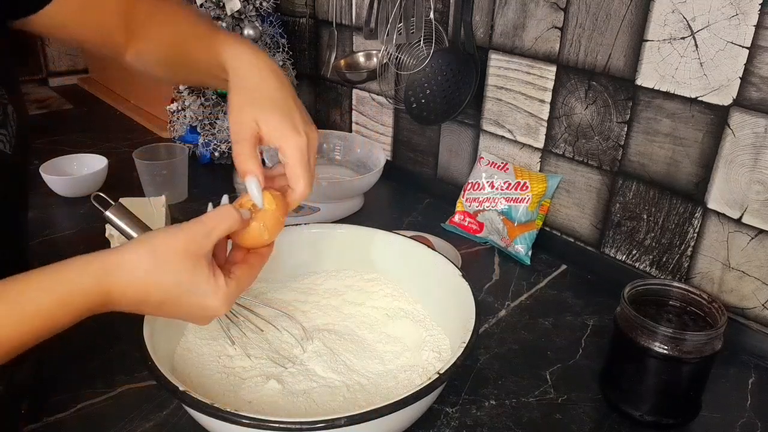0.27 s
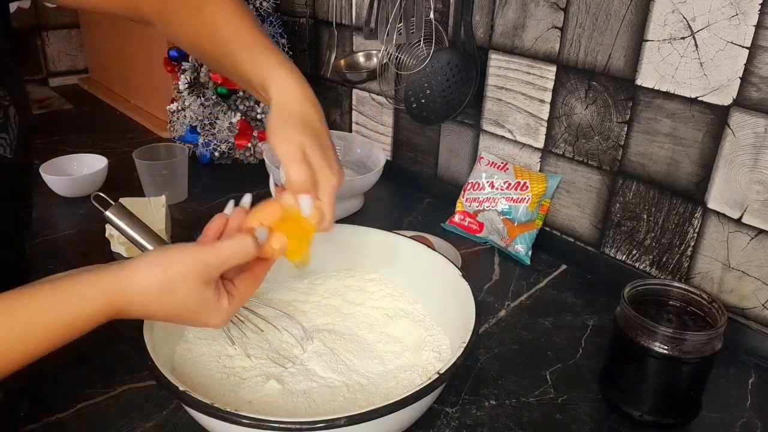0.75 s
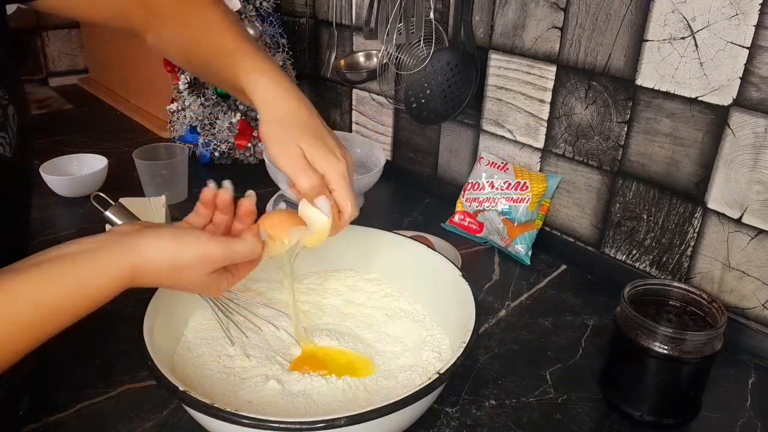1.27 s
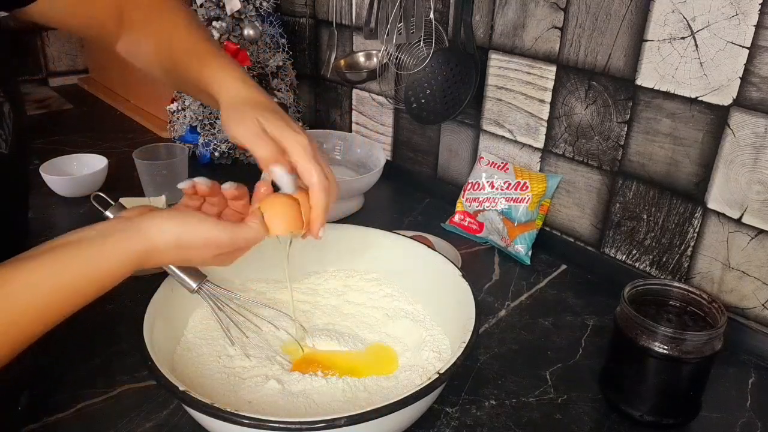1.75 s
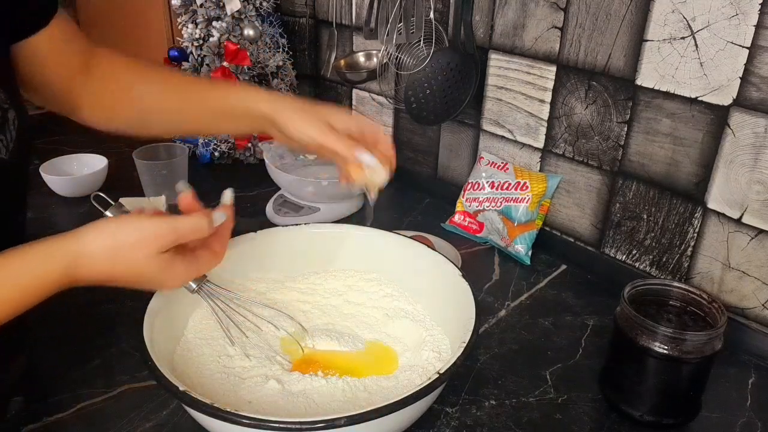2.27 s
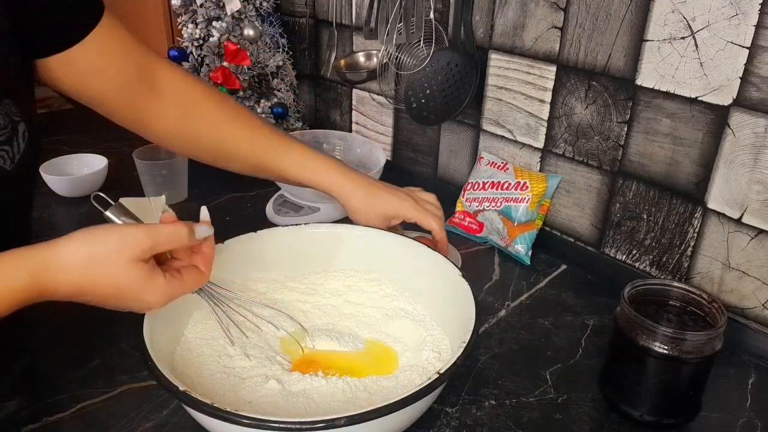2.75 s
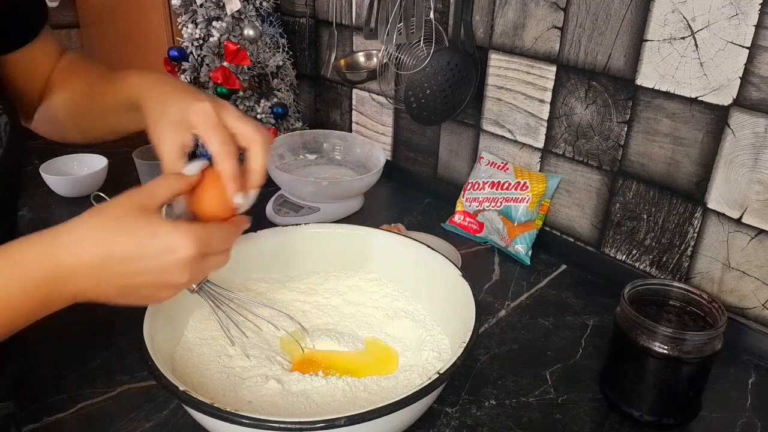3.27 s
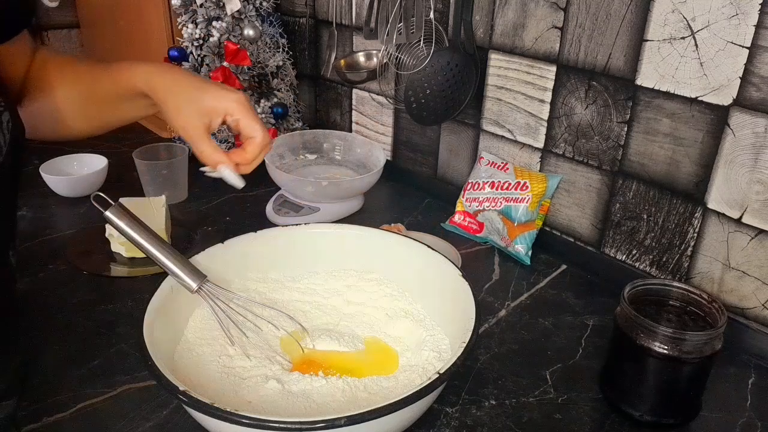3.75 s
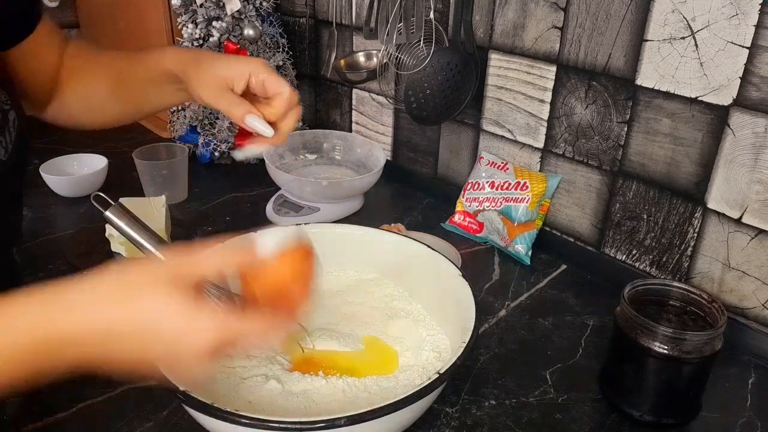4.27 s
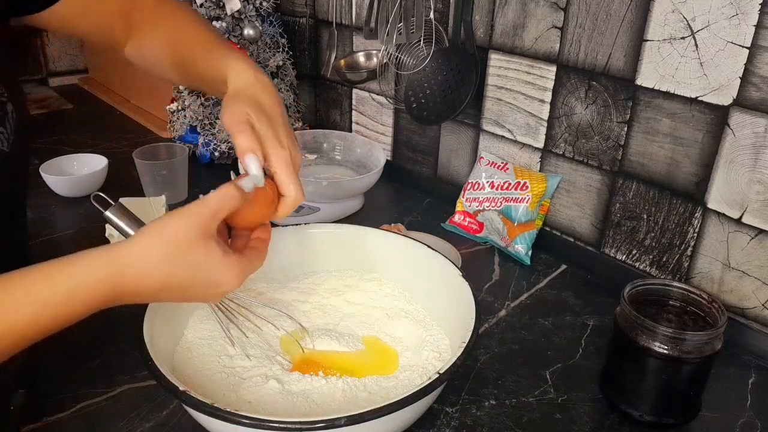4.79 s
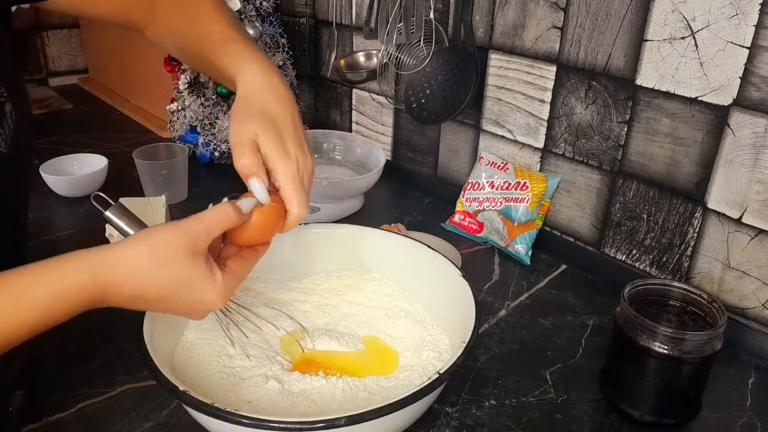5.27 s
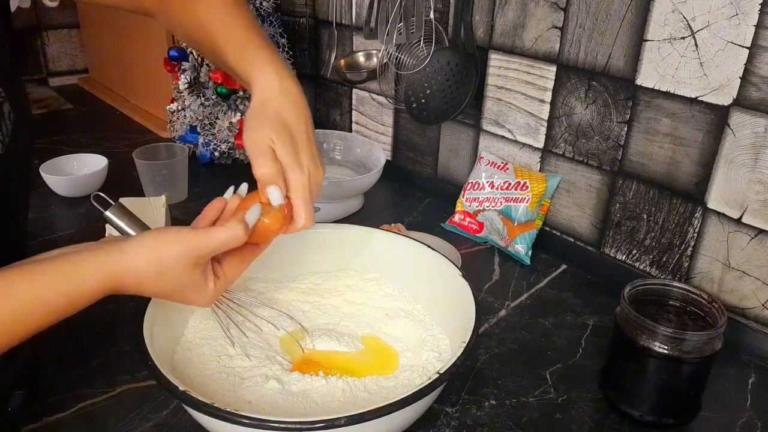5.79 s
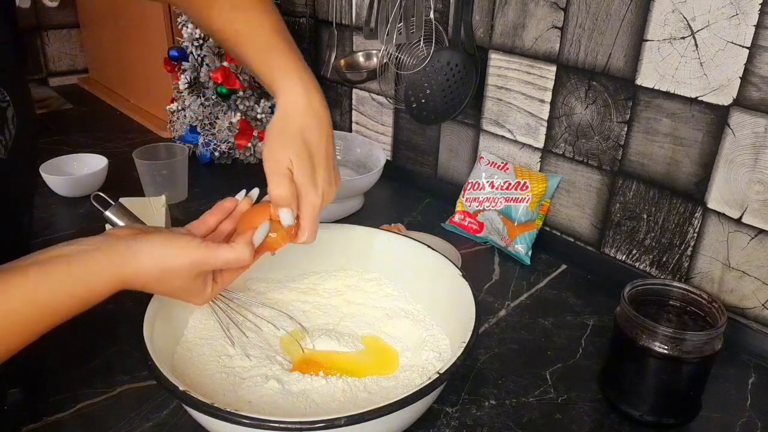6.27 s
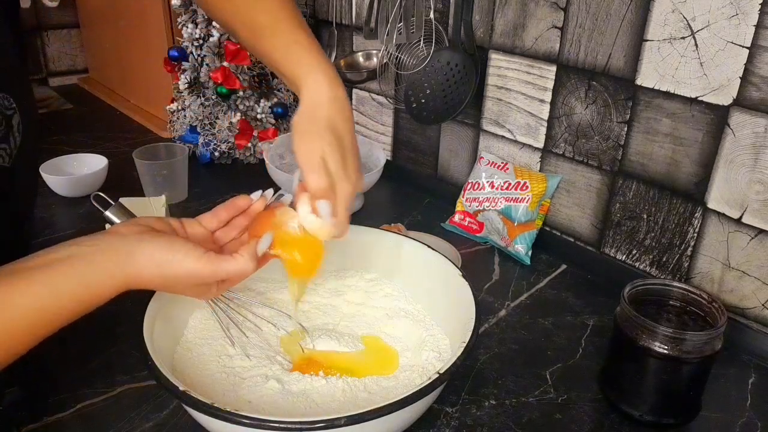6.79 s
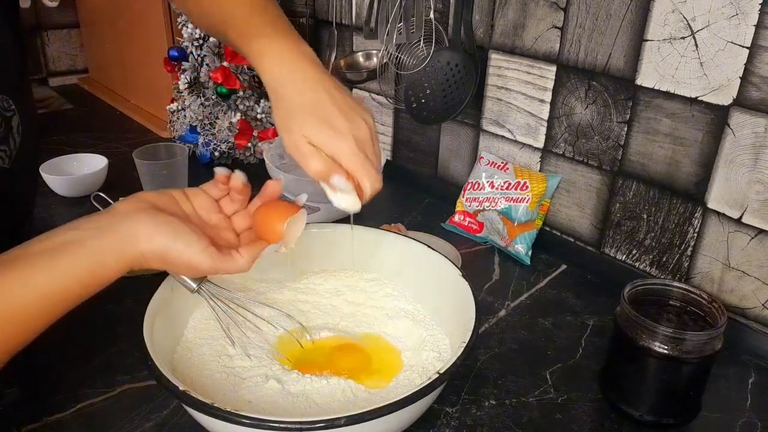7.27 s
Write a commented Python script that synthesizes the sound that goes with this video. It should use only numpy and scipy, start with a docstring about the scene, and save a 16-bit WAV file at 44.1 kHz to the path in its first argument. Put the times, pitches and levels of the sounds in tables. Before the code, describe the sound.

A close stereo microphone in a small tiled kitchen hears a steady low fridge hum near 100 Hz, with soft rumbling air and faint hiss, gently rising and falling. From 0 to 0.7 seconds, eggshell ticks under fingers, with its strongest crisp crack at about 0.5. Faint crumbling follows, growing into a hollow flurry of small crackles at 1.5 to 1.9. Around 2.4 a thin dish gives a very short, high ringing squeak, slightly to the right, followed by dull plastic bowl bumps until 2.75. Mostly hum remains, with tiny ticks, until a hard, dry egg knock on the worktop at 3.86 with a quickly fading noisy tail. From 4.8 brittle picking returns, with a sharp snap at 5.44, scattered crackles, then the biggest crunch at 6.5 to 6.63. Sparse, faint shell ticks trail off to 7.5 over the hum, with short room echoes.

```python
"""Shell crackles under picking nails over the hum of a fridge: two eggs are opened by hand in a tiled kitchen.
Later a thin dish squeaks, a plastic bowl is bumped, and an egg is knocked hard on the worktop.
Shell breaks are short noise puffs through resonances; the dish is a set of sines, the bowl filtered blows.
The knock is a tick with a noisy tail; the fridge is two low tones with air noise and hiss, and the
levels of hum and background are set over time by a table. Noise tails add the small room."""
import sys
import numpy as np
from scipy import signal
from scipy.fft import rfft, irfft
from scipy.io import wavfile
from scipy.ndimage import uniform_filter1d

SR = 44100
rng = np.random.default_rng(int(sys.argv[2]) if len(sys.argv) > 2 else 0)


def dump_mix(stems):
    """Bounce the given channels to the path in sys.argv[1] as a 16-bit WAV at rate SR."""
    frames = np.atleast_2d(stems).T  # one column per channel
    limited = np.clip(frames, -1, 1)  # hard clip at full scale
    pcm = np.round(limited * 32767).astype(np.int16)
    wavfile.write(sys.argv[1], SR, pcm)


def gain_from_db(level_db):
    """Turn a decibel level (scalar or array-like) into a linear amplitude factor."""
    decades = np.asarray(level_db, float) / 20
    return 10 ** decades


N = 332514  # length in samples
TIME = np.arange(N) / SR


def curve(rows):
    """Turn each level column of a table into one value per sample, silent outside the table."""
    s, *columns = np.transpose(rows)
    return [np.interp(TIME, s, column, -120, -120) for column in columns]


def on_log(points, hz):
    """Read (pitch, value) points on a log-frequency axis."""
    point_hz, value = np.transpose(points)
    return np.interp(np.log(hz + 1), np.log(point_hz), value)


def unit(x):
    """Scale to rms 1."""
    return x / np.sqrt(np.mean(x ** 2))


def peak(x, db):
    """Scale to a peak level in dB."""
    return x * gain_from_db(db) / np.abs(x).max()


def band(x, hz, width):
    """Pass x through a resonance with gain 1 at its centre."""
    return signal.lfilter(*signal.iirpeak(hz, hz / width, fs=SR), x)


def band_twice(x, hz, width, second_width):
    """Pass x through two resonances at one pitch, for steeper sides."""
    return band(band(x, hz, width), hz, second_width)


def colour(x, points):
    """Weight the spectrum of x by (pitch_hz, level_db) points."""
    size = x.shape[-1]
    gain_db = on_log(points, np.fft.rfftfreq(size, 1 / SR))
    return irfft(rfft(x) * gain_from_db(gain_db), size)


def add(out, x, s):
    """Mix x into out from time s in seconds."""
    i = int(s * SR)
    out[..., i:i + x.shape[-1]] += x[..., :N - i]


def burst(decay_s, size=1024):
    """Make a puff of noise that dies within milliseconds."""
    return rng.standard_normal(size) * np.exp(-np.arange(size) / (decay_s * SR))


# how long the room rings at each pitch, to fall by 60 dB: pitch_hz, ring_time_s
ROOM_RING = [(200, 0.23), (1000, 0.24), (4000, 0.18), (9000, 0.09), (15000, 0.14)]


def room(x):
    """Add the kitchen's echoes: octave bands of noise, each dying at its own rate, most alike in the bass."""
    t = TIME[:SR // 2]
    tail = 0
    for hz in 125 * 2. ** np.arange(8):
        centre_hz = min(hz, 14000)
        noise = band(rng.standard_normal((2, len(t))), centre_hz, centre_hz * 1.29)
        noise = noise + min(300.0 / hz, 2) * noise.mean(axis=0)  # shared by left and right
        fade = np.exp(-np.log(1000) * t / on_log(ROOM_RING, hz))
        tail = tail + unit(noise) * np.sqrt(hz) * fade
    tail = tail * np.clip(t / 0.0027, 0, 1)  # the first walls answer after a few milliseconds
    tail = tail / np.sqrt((tail ** 2).sum() / 2)
    return signal.fftconvolve(x[None], tail, axes=1)[:, :N]


def near(x):
    """Delay the left side by one sample; bowl and worktop scatter the sound for a few milliseconds."""
    scatter = gain_from_db(-19) * band(np.array([burst(.002), burst(.002)]), 7000., 12000.)
    scatter[0, 1] = scatter[1, 0] = 1  # the direct sound
    return signal.fftconvolve(x + np.zeros((2, 1)), scatter, axes=1)[:, :N]


# levels of hum and background noise over time: time_s, relative_hum_db, relative_background_db
BACKGROUND_LEVELS = [(0.0, -43, 2), (0.04, -34.5, 4), (0.9, -40, -1), (1.34, -35.5, 0.5), (1.41, -42.5, 1),
                     (1.62, -35.5, 1.5), (2.01, -38.5, 0), (2.08, -44, -0.5), (2.48, -29.5, 3.5),
                     (2.54, -36, 0.5), (3.53, -35, 1.5), (4.11, -40.5, -3.5), (4.66, -37, -1.5),
                     (4.7, -41.5, -3.5), (5.23, -33.5, 4), (5.27, -40, -0.5), (5.46, -31, 5),
                     (5.67, -36, 0), (6.49, -35, 0.5), (7.54, -37.5, 0)]
# tone colour of the air noise: pitch_hz, relative_level_db (per Hz)
AIR_COLOUR = [(20, -41), (32, -13.5), (50, 5.5), (120, 1), (210, -2), (300, -9), (500, -13.5), (800, -20),
              (1100, -25), (2000, -33), (5000, -65)]
# narrow peaks in the background noise: pitch_hz, width_hz, level_db (before the level table)
AIR_PEAKS = [(177.9, 29.6, -52), (327.8, 42, -64), (722, 59, -72.5), (7520, 380, -68.5), (8320, 680, -67)]
# how alike left and right are: pitch_hz, likeness (0 to 1)
AIR_ALIKE = [(60, 0.4), (250, 0.9), (600, 0.2), (3000, 0), (16000, 0.27)]
# tone colour of the hiss: pitch_hz, relative_level_db (per Hz)
HISS_COLOUR = [(500, -36.5), (1500, 5.5), (3000, 5), (5000, -1.5), (6500, -3), (10000, -4.5), (13000, 3),
               (16000, 0.5)]


def fridge():
    """Put a mains hum and a shaft tone over air noise and hiss, most alike left and right in the lows."""
    hum_hz, shaft_hz = 99.4, 41.9
    air_db, hiss_db, flicker_db = -44, -58, 2  # noise before the level table; rms random change of the hum
    hum_db, background_db = curve(BACKGROUND_LEVELS)
    flicker = uniform_filter1d(uniform_filter1d(rng.standard_normal(N), size=3000), size=3000)
    hum_db = hum_db + flicker_db * unit(flicker)

    mid, side = rng.standard_normal((2, N))
    alike = np.clip(on_log(AIR_ALIKE, np.fft.rfftfreq(N, 1 / SR)), 0, 1)
    mid = irfft(rfft(mid) * np.sqrt(1 + alike), N)
    side = irfft(rfft(side) * np.sqrt(1 - alike), N)
    noise = mid + side * np.array([[1], [-1]])
    air = unit(colour(noise, AIR_COLOUR)) * gain_from_db(air_db)
    hiss = unit(colour(noise[:, ::-1], HISS_COLOUR)) * gain_from_db(hiss_db)  # same noise played backwards
    peaks = sum(gain_from_db(db) * unit(band_twice(noise, hz, w, w)) for hz, w, db in AIR_PEAKS)

    hum = gain_from_db(hum_db + np.array([[3.3], [2.7]])) * np.sin(2 * np.pi * hum_hz * TIME)
    slow_db = uniform_filter1d(hum_db, size=SR // 4)  # the shaft tone takes a smoothed copy of the hum level
    shaft = gain_from_db(slow_db - np.array([[6.5], [7.5]])) * np.sin(2 * np.pi * shaft_hz * TIME)
    return (air + hiss + peaks) * gain_from_db(background_db) + hum + shaft


# a plastic bowl bumped on the worktop: start_s, relative_level_db, clack_db (against the body of the bump)
BUMPS = [(2.431, -15.5, 0), (2.436, -16, 7.5), (2.444, -15, 3.5), (2.452, -33, -14), (2.467, -27.5, 4.5),
         (2.626, -30, -32), (2.646, -23, -28.5), (2.656, -17, -28), (2.668, -36, -13.5), (2.678, -36, -12),
         (2.699, -35.5, -10), (2.72, -22.5, -31), (2.734, -46, -8)]
# resonances of the bowl: pitch_hz, width_hz, relative_level_db
BOWL = [(189, 48, -7), (332, 60, -6), (389, 52, -0.5), (506, 37, -19.5), (660, 34, -6.5), (880, 63, -47.5)]


def bumps():
    """Send soft blows through the resonances of the bowl, with a louder clack on the sharper ones."""
    out = np.zeros(N)
    for s, db, clack_db in BUMPS:
        push = signal.lfilter(*signal.butter(4, 1000., fs=SR), burst(0.0061, size=4096))
        body = peak(sum(gain_from_db(mode_db) * band(push, hz, w) for hz, w, mode_db in BOWL), 0)
        clack = peak(band(burst(0.0073, size=4096), 1820.0, 3500.0), clack_db)
        add(out, gain_from_db(db) * (body + clack), s)
    return out


# ringing pitches of a thin dish: pitch_hz, ring_time_s (to fall 60 dB), squeak_db, tap_db (both relative)
DISH = [(1746, 0.12, -26.5, -36), (3556, 0.14, -23, -30), (4310, 0.11, -28.5, -48),
        (5410, .081, -24.5, -41), (6790, 0.056, -44, -38), (7390, 0.083, -19.5, -53),
        (8500, .06, -42.5, -56), (10000, 0.05, -35, -40.5), (11800, 0.054, -31.5, -50.5)]
# the dish is dragged, the grip swelling and letting go: time_s, grip_db (relative)
SCRAPE = [(2.379, -48.5), (2.386, -13), (2.418, -0.5), (2.44, -14), (2.45, -46)]
# light taps on the dish: start_s, relative_level_db
TAPS = [(2.452, -2), (2.656, -9.5), (2.722, -21)]


def dish():
    """Sing the dish's pitches as stick and slip drive them, a little roughly; light taps ring them again."""
    grip = gain_from_db(curve(SCRAPE)[0])
    out, t = np.zeros(N), TIME[:SR // 2]
    for hz, ring_s, squeak_db, tap_db in DISH:
        rough = unit(band(rng.standard_normal(N), hz, 140.0))
        tone = np.sin(2 * np.pi * hz * TIME)
        out = out + gain_from_db(squeak_db) * grip * (tone + 0.3 * rough)
        for s, db in TAPS:
            fade = gain_from_db(db + tap_db - 60 * t / ring_s)
            add(out, fade * np.sin(2 * np.pi * hz * t), s)
    return out


# the egg on the worktop: start_s, tick_level_db (peak before scattering)
KNOCK = (3.8598, 2.5)
# tone colour of the noisy tail: pitch_hz, relative_level_db (per Hz)
TAIL_COLOUR = [(29, -31), (50, 5), (151, -4), (183, -17.5), (317, 6.5), (360, -11.5), (427, -9),
               (879, -1.5), (1400, -7.5), (2190, -1.5), (3890, -8.5), (5120, -5.5), (8000, -17.5),
               (10400, -52), (17600, -120)]


def knock():
    """Make a hard tick as the shell caves in, then a wide noisy tail whose level follows a set curve."""
    s, db = KNOCK
    tick = np.zeros(N)
    snap = band(burst(0.00068), 3300., 4000.0)
    sizzle = band(burst(0.002), 12000.0, 8000.)
    add(tick, peak(snap + gain_from_db(-12.5) * sizzle, db), s)

    # the level in dB drops with the square of time: little at first, then ever faster
    t = np.clip(TIME - s, 0, 1)
    tail_level = (TIME > s) * gain_from_db(-19.5 - 9.5 * (t / 0.096) ** 2)
    # the treble flashes for about 10 ms, then dulls steadily by 71 dB a second against the rest
    treble_db = -5 - 71 * t + 8 * np.exp(-t / 0.01)
    noise = rng.standard_normal((3, N))
    noise = noise[:2] + 0.49 * noise[2]  # partly shared by left and right
    treble = band(band(noise, 12300.0, 9000.), 12800.0, 9000.)
    tail = tail_level * (unit(colour(noise, TAIL_COLOUR)) + gain_from_db(treble_db) * unit(treble))
    return tick, tail


# shell and skin crumbling under the fingers, one list per spell of handling: time_s, relative_level_db
CRUMBLE = [
    [(0.0, -41), (0.044, -38.5), (0.094, -58), (0.132, -34.5), (0.208, -56.5), (0.408, -53), (0.5, -40.5),
     (0.736, -64)],
    [(1.0, -60), (1.128, -50), (1.272, -59), (1.294, -45.5), (1.504, -57.5), (1.532, -41.5), (1.68, -45.5),
     (1.76, -48.5), (1.79, -29), (1.88, -45.5), (2.0, -90)],
    [(4.72, -69), (4.822, -41.5), (4.89, -57), (4.904, -32.5), (5.066, -64), (5.114, -29.5), (5.27, -73),
     (5.352, -33), (5.42, -49), (5.668, -59), (5.682, -41), (5.86, -53), (5.95, -65)],
    [(6.05, -57), (6.39, -58.5), (6.46, -73), (6.522, -37.5), (6.6, -58), (6.68, -55), (6.78, -53),
     (6.85, -66), (6.866, -56), (6.97, -52), (7.06, -60), (7.336, -65.5), (7.378, -56.5), (7.54, -62)],
]
# sound of each spell; opened halves are duller and hollower: pitch_hz, hollow_db (against the bright part)
CRUMBLE_COLOUR = [(6500, -5.5), (4000, 0), (6500, -10.5), (6500, -2.5)]


def crumble():
    """Scatter about two thousand tiny breaks a second, a few bigger than the rest."""
    chance = rng.random(N)
    size = np.minimum(rng.exponential(size=N), 4)
    ticks = (chance < 2000 / SR) * gain_from_db(3.3 * size) * rng.standard_normal(N)
    hollow = unit(band_twice(ticks, 1680, 230.0, 600.))
    out = 0
    for rows, (hz, hollow_db) in zip(CRUMBLE, CRUMBLE_COLOUR):
        bright = unit(band_twice(ticks, hz, 1.1 * hz, 1.7 * hz))
        out = out + gain_from_db(curve(rows)[0]) * (bright + gain_from_db(hollow_db) * hollow)
    return out


# shell cracks: start_s, ring_level_db (peak before scattering), pitch_hz, brittle_db (relative brightness)
CRACKS = [(0.0153, -35, 6500, 0), (0.0313, -21.5, 7400, -19), (0.046, -20, 7250, -12),
          (0.0996, -25.5, 7600, -25), (0.131, -28, 7000, -7), (0.139, -19.5, 6700, -28),
          (0.164, -33, 1350, -1), (0.193, -31, 8450, -7), (0.3413, -36.5, 1450, -5),
          (0.4175, -27.5, 1220, -41), (0.4271, -26, 1160, -38), (0.4372, -29, 1260, -27),
          (0.4796, -23.5, 6960, -8), (0.5034, -21, 4000, -10), (0.5078, -8.5, 3860, -5.5),
          (0.5173, -8, 3280, -9), (0.5248, 0, 3300, -52), (0.5346, -19, 3210, 1.5),
          (0.5404, -13, 3220, -22), (0.603, -28.5, 3230, 3.5), (0.653, -37, 3520, -8),
          (0.6822, -40, 7570, -17), (1.087, -37, 8320, -10), (1.1012, -35.5, 6200, -1),
          (1.1106, -27.5, 2250, -23), (1.1604, -37, 1680, -16), (1.1875, -36, 1780, -10),
          (1.3286, -37, 3300, -5), (1.3747, -38.5, 5900, 5), (1.518, -26, 7300, -8),
          (1.5233, -26.5, 4300, -26), (1.5326, -29.5, 2100, -20), (1.568, -28, 4370, -30),
          (1.5833, -28.5, 1700, -29), (1.6176, -29.5, 4300, -27), (1.65, -28, 5800, -19),
          (1.6577, -30.5, 5100, -6), (1.706, -19, 6140, -7.5), (1.775, -32, 1860, -1),
          (1.7832, -29.5, 1810, 9.5), (1.7885, -22, 3250, -3), (1.7957, -18, 2280, -7),
          (1.802, -24, 3830, -8), (1.8228, -21, 1830, -7), (1.8275, -21.5, 3870, -10),
          (1.8335, -24, 2270, -8), (1.8506, -26, 1630, -23), (1.862, -17.5, 1950, -4.5),
          (1.8679, -22.5, 4000, -6), (1.8745, -24.5, 2330, -8), (3.017, -39.5, 1560, -10),
          (3.0925, -33, 13000, -6), (3.3236, -32.5, 8370, -14.5), (3.3245, -29.5, 14000, -13),
          (3.6965, -40.5, 8110, -32), (4.534, -34, 8330, -17.5), (4.686, -43, 8440, -7),
          (4.771, -48, 2980, 0), (4.807, -41, 3000, 2.5), (4.8707, -42, 3370, -4), (4.9033, -23, 6600, -8),
          (4.923, -42, 6000, 0), (4.935, -31, 3380, -6), (4.9984, -34, 3600, -4), (5.008, -20, 9400, -6),
          (5.084, -32, 9960, -25), (5.1, -29.5, 8900, -12), (5.1069, -26.5, 8500, 2), (5.123, -34, 7750, 3),
          (5.163, -26, 7400, -20), (5.1966, -23.5, 4570, 4), (5.3366, -30.5, 4410, -3.5),
          (5.3596, -30.5, 3500, -9), (5.3954, -17, 7520, -28), (5.418, -23, 6310, -1.5),
          (5.431, -24, 5900, 2.5), (5.44, -7.5, 5790, -7.5), (5.4433, -20.5, 1320, -14),
          (5.4472, -19.5, 5010, 10.5), (5.4578, -15.5, 7020, 10.5), (5.463, -22, 1300, -11),
          (5.4872, -26, 5060, 2), (5.5037, -29, 6010, 8.5), (5.5144, -30, 5900, -5),
          (5.5583, -31.5, 7700, -29), (5.6821, -33.5, 6650, -1.5), (5.7004, -20.5, 7570, -4),
          (5.7225, -38.5, 7010, 9.5), (5.801, -19.5, 8340, -12.5), (5.8219, -25, 5660, -9),
          (6.1, -25, 12500, -4), (6.3835, -37, 5420, -23), (6.4951, -23.5, 5650, 2.5),
          (6.502, -10, 8700, -15), (6.516, -5.5, 5640, -6), (6.525, -12.5, 3400, -18),
          (6.5365, -15, 4440, 1), (6.543, -2, 3350, -30), (6.5505, -23, 3520, -8), (6.6082, -23, 3200, -5),
          (6.614, -11, 3230, -37), (6.6309, -17, 3260, -11), (6.6374, -28.5, 3300, -9),
          (6.6774, -34, 8800, -20), (6.724, -47, 1480, -11), (6.774, -46, 1660, -6),
          (6.8698, -38.5, 1530, -7), (6.9521, -38.5, 2060, -3), (6.9915, -37, 6430, -20),
          (7.035, -35.5, 9530, -30), (7.0836, -47, 2100, -3), (7.37, -42, 7000, -10),
          (7.3845, -38, 7000, -5), (7.423, -26, 7670, -41)]


def cracks():
    """Crunch the shell: each break rings at its own pitch, with a hollow pop and a brittle tick."""
    decay_s, pop_hz, brittle_hz = 0.00297, 1450, 2728
    out, t = np.zeros((2, N)), TIME[:2048]
    for s, db, hz, brittle_db in CRACKS:
        grit = gain_from_db(5.9 * rng.standard_normal(64)).repeat(32)  # the crack runs on in uneven jerks
        both, left, right = (burst(decay_s, size=2048) for _ in range(3))
        # the curved shell sends each side a somewhat different crunch
        tear = (both + 0.64 * np.array([left, right])) * grit
        tear = tear * np.clip(t / 0.00012, .2, 1)  # softens the very start

        # high rings are damped faster
        width = np.clip(hz / 8.5 * max(1, hz / 3600.0) ** 1.2, 330, 5500)
        ring = peak(band_twice(tear, hz, width, 3.2 * width), 0)
        # stiff, high bits and light cracks pop less
        hollow_db = -10 - 4 * np.log2(hz / 3000) + 1.1 * db
        hollow = peak(band_twice(tear, pop_hz, 1000, 1500.0), hollow_db)
        bright = signal.lfilter(*signal.butter(2, brittle_hz, "high", fs=SR), tear)
        brittle = peak(bright, brittle_db + 8.0)
        palm = peak(band_twice(tear, 600., 500., 500.), -25)  # the hand holding the egg thumps faintly
        add(out, (ring + hollow + brittle + palm) * gain_from_db(db), s)
    return out


def scene():
    """Mix the hands up close, the dish and bowl, the room and the fridge."""
    background = fridge()
    thuds, ring = bumps(), dish()
    tick, knock_tail = knock()
    fine, shell = crumble(), cracks()
    wet = room(gain_from_db(-3.5) * shell.mean(axis=0) + gain_from_db(-13.5) * fine + gain_from_db(-4) * ring + gain_from_db(-4.0) * thuds)
    direct = near(shell + tick + gain_from_db(-7) * fine + gain_from_db(-2.5) * thuds)
    wide_ring = ring * gain_from_db(np.array([[-1], [1]]))  # the dish is louder on the right
    return direct + knock_tail + wide_ring + wet + background


def top_cut(x):
    """Nothing passes above the cut-off."""
    return signal.sosfilt(signal.butter(12, 16660, fs=SR, output="sos"), x)


def record(dry):
    """Clip the highest peaks, then cut the top of the treble with a steep filter."""
    top_hz = 15800
    clipped = np.clip(dry, -1, 1)
    low_pass = signal.ellip(8, .2, 36, top_hz, fs=SR, output="sos")
    mix = signal.sosfilt(low_pass, clipped)
    return top_cut(mix)


dry = scene()
out = record(dry)
dump_mix(out)
```